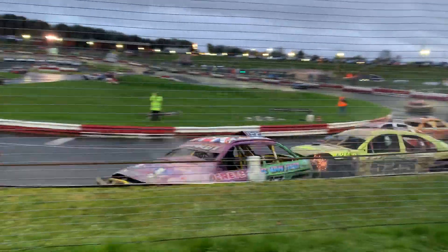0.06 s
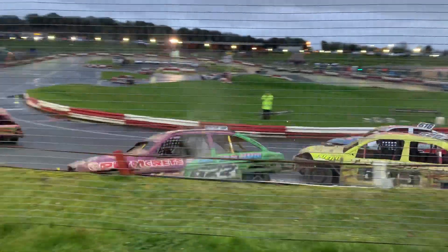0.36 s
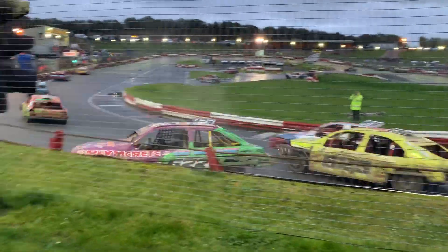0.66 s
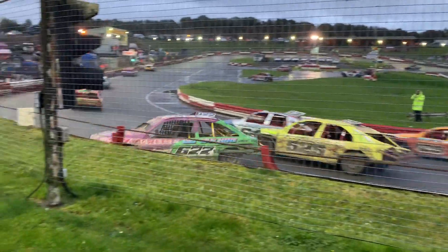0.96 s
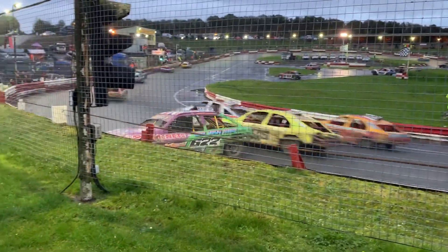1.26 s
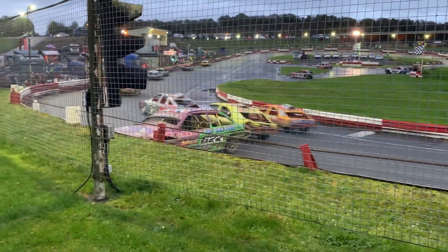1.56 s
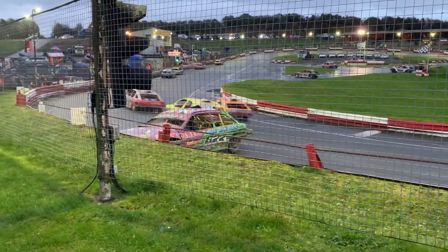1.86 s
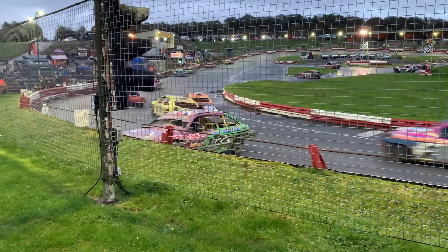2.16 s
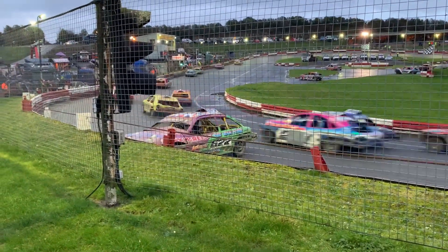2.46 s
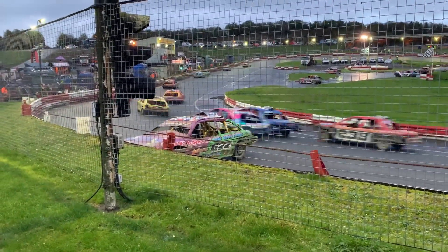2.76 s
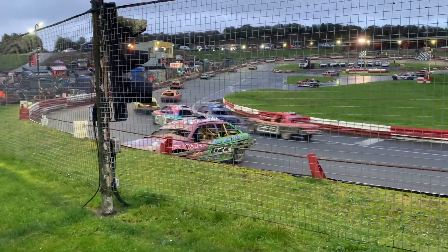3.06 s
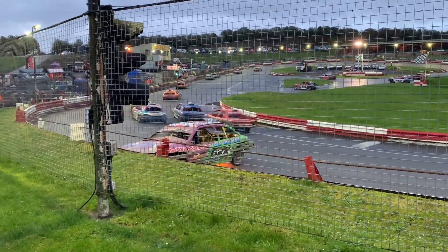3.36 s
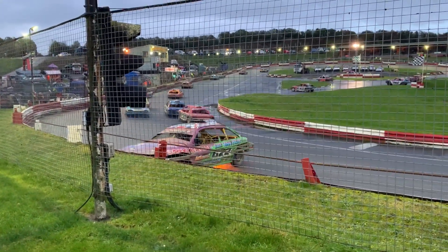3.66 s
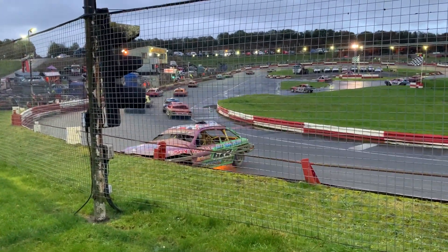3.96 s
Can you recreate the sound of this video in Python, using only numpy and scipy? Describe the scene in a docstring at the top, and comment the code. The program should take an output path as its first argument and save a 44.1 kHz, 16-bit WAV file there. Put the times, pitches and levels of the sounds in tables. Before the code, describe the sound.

Loud stock car engines drone and accelerate after one car crunches and clangs along a barrier.

```python
"""Stock cars accelerate out of a bend on an oval track, heard by a microphone pair at the fence.
In the first second a car crunches along the barrier in three surges: panels boom, steel clangs,
grit sprays and sliding tyres squeal. Then the four-cylinder exhausts, beating against each other,
take over and pop four times around the two-second mark. Near the end tyres squeal again as the
engines climb in pitch. The rest of the field drones behind throughout."""
import sys
import numpy as np
from scipy import signal
from scipy.fft import rfft, irfft, next_fast_len
from scipy.io import wavfile
from scipy.ndimage import uniform_filter1d, minimum_filter1d, map_coordinates

SR = 44100
rng = np.random.default_rng(int(sys.argv[2]) if len(sys.argv) > 2 else 0)


def unload_wav(signal):
    """Save mono or channel-first audio to the path in sys.argv[1] as 16-bit WAV at rate SR, clipped to [-1, 1]."""
    wavfile.write(
        sys.argv[1],
        SR,
        np.round(np.clip(np.atleast_2d(signal).T, -1, 1) * 32767).astype(np.int16),
    )


N = 176400

# Spectrum of the exhaust roar and pops: (frequency [Hz], relative level [dB])
ROAR_SPECTRUM = [(200, -9.5), (330, -11), (480, 0), (620, -3), (760, -15), (920, -8), (1200, -26.5),
                 (2500, -40)]
# Spectrum of grit and cracks: (frequency [Hz], relative level [dB])
GRIT_SPECTRUM = [(1500, -18), (3200, 2), (4300, 4), (5500, -1), (8000, -1), (10500, -5), (13000, -11),
                 (15000, -14), (18000, -20)]
# Modes of struck steel: (frequency [Hz], relative level [dB], 60 dB decay time [s])
STEEL_MODES = [(1040, 1, .11), (1250, -3, .12), (1405, -1, .1), (1513, -2, .1), (1620, -1, .12),
               (1836, 0, .12), (1975, -2, .09), (2085, -3, .09), (2410, -3, .1), (2902, -9, .12),
               (3370, -9, .14), (3736, -13, .14)]
CLANG_RISE_S = 0.00089


def engine(run, trim_db, overtone_db):
    """Harmonic series of four firings a cycle; unequal cylinders add weak orders between the harmonics."""
    # Exhaust pipe overtones: (frequency [Hz], relative level [dB])
    pipe = [(60, -18.5), (180, -8.5), (250, -17), (350, -19.5), (490, -20), (620, -30), (780, -34.5),
            (1000, -35), (1600, -37)]
    # Boom once a crank turn: (crank rate [Hz], level [dB])
    throb_spectrum = [(35, -43.5), (44, -27.5), (51, -30.5), (56, -29.5), (61, -47.5), (90, -42.5)]
    # Swell of that boom: (time [s], gain [dB])
    throb_swell = [(0, -9), (.85, -3.5), (1.05, -0.5), (1.27, -8), (1.45, 3.5), (2.7, 0), (3, -1)]
    uneven_db, drift_db, smear_rad, flutter_db, fade_s = -7.5, 4, 0.9, 1.13, 0.19
    firing_hz, db = curves(run)
    t = clock()
    knots = np.linspace(0, t[-1], 65)
    drift = lambda: np.interp(t, knots, rng.standard_normal(len(knots)))
    fade = np.clip(1 + np.minimum(t - run[0][0], run[-1][0] - t) / fade_s, 0, 1)
    firings = np.cumsum(firing_hz * (1 + 0.004 * wobble(9))) / SR  # the speed wavers
    phase = 2 * np.pi * (firings + 0.006 * wobble(60) + rng.random())  # the timing jitters
    tone = np.sin(phase)
    throb = amp(along(throb_spectrum, firing_hz / 2) + curves(throb_swell)[0]) * np.sin(phase / 2)
    for k in [3, *range(5, 36)]:  # k = 4 is the firing tone itself
        order = k / 4
        level = along(pipe, order * firing_hz) + overtone_db + uneven_db * (k % 4 > 0)
        gain = amp(level + drift_db * drift())
        tone += gain * np.sin(order * phase + smear_rad * drift() + 2 * np.pi * rng.random())
    return np.sqrt(2) * fade * (amp(db + trim_db + flutter_db * wobble(35)) * tone + throb), phase


def near_cars():
    """Beating: five exhausts of differing pitch interfere. Returns their sum and firing phases."""
    # One run per car: (time [s], firing rate [Hz], relative level [dB])
    car_a = [(0, 73, -13), (0.22, 82.3, -33), (0.4, 89.38, -15.5), (0.58, 90.56, -15.5), (0.75, 86.73, -17),
             (0.9, 86, -18.5), (1.08, 88.22, -19.5), (1.27, 88.9, -30.5), (1.43, 96.07, -21.5),
             (1.58, 84.83, -20.5), (1.72, 92.4, -20.5), (1.92, 93.5, -20.5), (2.1, 97.2, -21),
             (2.5, 101.5, -22.5), (2.9, 107.8, -21), (3.22, 111.9, -15), (3.45, 118.5, -18.5),
             (3.65, 125, -18), (4, 132.7, -11.5)]
    car_b = [(0, 152.5, -20.5), (0.2, 150.3, -17.5), (0.42, 146.4, -19), (0.7, 151, -27), (1, 154.7, -27),
             (1.3, 162.5, -19.5), (1.6, 165.3, -21.5), (1.9, 170.8, -21), (2.25, 170.5, -17.5),
             (2.45, 160.4, -23.5), (2.7, 163.2, -18.5), (3.05, 164.2, -23), (3.4, 162.6, -21.5),
             (4, 162, -16.5)]
    car_c = [(0.9, 149.4, -23.5), (1.2, 149.5, -20.5), (1.45, 150, -18), (1.65, 152.2, -20.5),
             (1.85, 157.4, -14.5), (2.1, 160.3, -22), (2.35, 156.2, -21), (2.52, 160, -18),
             (2.7, 166.9, -21.5), (2.95, 170, -19), (3.25, 173, -18.5), (3.5, 179.6, -24),
             (4, 189.7, -19.5)]
    car_d = [(0, 119.5, -25), (0.6, 121, -26), (1.1, 118.5, -26), (1.42, 122.4, -25), (1.57, 126.2, -12),
             (1.76, 126.1, -18.5), (1.95, 122.8, -28.5), (2.4, 121.7, -17.5), (2.8, 123.5, -17),
             (3.15, 124, -19), (3.42, 132.2, -17.5), (3.75, 140.1, -20.5), (4, 142.3, -17.5)]
    car_e = [(0, 129.7, -28.5), (0.3, 131.9, -16.5), (0.6, 136, -18), (1.2, 137.3, -32.5), (1.9, 133, -22),
             (2.05, 137.4, -19), (2.18, 142.8, -28.5), (2.35, 136.9, -13.5), (2.55, 146, -15.5),
             (2.75, 148.1, -26), (3.1, 151.4, -25)]
    sounds, phases = zip(engine(car_a, trim_db=0.49, overtone_db=1),
                         engine(car_b, trim_db=2.5, overtone_db=-1.8),
                         engine(car_c, trim_db=0, overtone_db=-0.44),
                         engine(car_d, trim_db=0, overtone_db=-6.5),
                         engine(car_e, trim_db=-0.82, overtone_db=-4.5))
    return sum(sounds), phases


def exhaust_noise(phases):
    """Amplitude modulation: roar and rasp come in puffs at the firing rates."""
    # Exhaust noise: (time [s], relative roar level [dB], relative rasp level [dB])
    levels = [(1.15, -33.5, -43.5), (1.34, -34, -42.5), (1.42, -32, -41.5), (1.98, -33.5, -44),
              (2.15, -34.5, -44), (2.28, -30.5, -42), (2.55, -35, -43), (2.8, -34.5, -44),
              (3.05, -37, -44.5), (3.3, -36.5, -44.5), (3.78, -34.5, -43), (3.9, -34.5, -44)]
    # Rasp: (frequency [Hz], relative level [dB])
    rasp_spectrum = [(600, -5), (1100, 1), (1650, -1.5), (2200, -9), (2800, -14), (3400, -15.5),
                     (4300, -23), (5500, -30.5), (7500, -38.5)]
    roar_db, rasp_db = curves(levels)
    puffs = unit(amp(0.54 * sum(np.cos(phase) for phase in phases)))
    roar = amp(roar_db + 6.5) * noise(ROAR_SPECTRUM, patchy_db=2)
    rasp = amp(rasp_db + 5.5) * noise(rasp_spectrum, patchy_db=2.5)
    return puffs * (roar + rasp)


def exhaust_pops():
    """Transients: barks with the spectrum of the roar rise sharply and decay exponentially."""
    # Pops: (time [s], level [dB])
    pops = [(1.676, -19.5), (1.742, -23), (1.904, -20.5), (2.341, -23)]
    rise_s, fall_db_per_s = 0.0017, 795.5
    envelope = swells([(s, db, rise_s, 0, fall_db_per_s) for s, db in pops])
    return envelope * noise(ROAR_SPECTRUM, patchy_db=5.5)


def ring(modes, rise_s):
    """Free vibration: one second of damped modes, weighted anew for each blow and wavering in phase."""
    t = clock()[:SR]
    hz, db, t60 = np.transpose(modes)[:, :, None]
    weights = amp(db + 2 * rng.standard_normal(db.shape))
    waver = np.array([np.interp(t, np.arange(110) / 110, rng.standard_normal(110)) for _ in modes])
    phase = 2 * np.pi * (hz * t + rng.random(hz.shape)) + 0.8 * waver
    tones = weights * amp(-60 * t / t60) * np.sin(phase)
    return (1 - np.exp(-t / rise_s)) * tones.sum(axis=0) / np.sqrt(np.sum(weights ** 2) / 2)


def barrier_blows():
    """Impact excitation: each contact cracks, booms a panel and rings the steel around its own pitch."""
    # Contacts: (time [s], boom level [dB], clang level [dB], crack level [dB], clang centre [Hz])
    contacts = [(0.108, -21.5, -21, -37.5, 1664), (0.156, -18, -21.5, -34.5, 2205),
                (0.325, -41.5, -24, -46, 2096), (0.337, -6, -23.5, -43, 1050),
                (0.356, -16.5, -29, -47, 2100), (0.402, -29, -24, -34, 3020), (0.513, -29, -31, -47, 1910),
                (0.739, -37.5, -37.5, -58.5, 1240), (0.821, -18, -33.5, -45, 2400),
                (0.893, -17.5, -31.5, -48.5, 1305)]
    # Body panel: (frequency [Hz], relative level [dB], 60 dB decay time [s])
    panel_modes = [(410, -4, .16), (466, -1.5, 0.17), (540, -9, 0.19), (606.5, -4, 0.12), (720, -6.5, 0.02),
                   (866, -5, 0.081)]
    focus_db_per_octave, crack_rise_s, crack_fall_db_per_s = 16, 0.001, 900
    rings = np.zeros(N + SR)
    for s, boom_db, clang_db, _, centre_hz in contacts:
        struck = [(hz, db - focus_db_per_octave * abs(np.log2(hz / centre_hz)), t60)
                  for hz, db, t60 in STEEL_MODES]
        boom = amp(boom_db) * ring(panel_modes, rise_s=0.00051)
        clang = amp(clang_db) * ring(struck, CLANG_RISE_S)
        rings[round(s * SR):][:SR] += boom + clang
    cracks = swells([(s, db, crack_rise_s, 0, crack_fall_db_per_s) for s, _, _, db, _ in contacts])
    return rings[:N] + cracks * noise(GRIT_SPECTRUM, patchy_db=-4.5)


def bodywork_crunch():
    """Random excitation: crumpling bodywork radiates grainy noise while loose steel rattles."""
    # Scrapes along the barrier: (time [s], level [dB], rise [s], hold [s], fall [dB/s])
    scrapes = [(-.02, -15.5, 0.011, 0.02, 80.5), (0.061, -22, 0.024, 0.038, 90),
               (0.107, -14.5, 0.005, 0.048, 129.5), (0.324, -23, 0.011, 0.029, 139),
               (0.36, -17.5, 0.015, 0.051, 112.5), (0.738, -39.5, 0.0048, .02, 142.5),
               (0.808, -24.5, 0.012, 0.055, 92.5)]
    # Crumpling metal: (frequency [Hz], relative level [dB])
    spectrum = [(150, -11), (300, 5.5), (450, 8), (620, 9), (740, 3), (980, 3), (1200, 3.5), (2000, -4),
                (2450, -6.5), (2700, -11.5), (3400, -14.5), (4600, -20.5), (7000, -33)]
    taps_per_s, scatter_db, rattle_db = 160, 5, -9
    crunch = unit(amp(1.5 * wobble(220)) * noise(spectrum, patchy_db=2.5))
    taps = (rng.random(N) < taps_per_s / SR) * amp(scatter_db * rng.uniform(-1.2, 1, N))
    rattle = unit(signal.fftconvolve(taps, ring(STEEL_MODES, CLANG_RISE_S))[:N])
    return swells(scrapes) * (crunch + amp(rattle_db) * rattle)


def grit():
    """Incoherent summation: grains thrown up by the scrapes merge into bright, flickering noise."""
    # Sprays: (time [s], level [dB], rise [s], hold [s], fall [dB/s])
    sprays = [(-.02, -44, 0.016, 0.13, 58), (.11, -37, 0.01, 0.028, 143), (.345, -38, 0.048, 0.027, 104.5),
              (.815, -46, .015, 0.066, 98.5)]
    return swells(sprays) * unit(amp(0.81 * wobble(600)) * noise(GRIT_SPECTRUM, patchy_db=-2))


def tyre_squeals():
    """Friction-driven oscillation: sliding tyres sing a rough, wavering, gliding note."""
    # Squeals: (time [s], duration [s], start pitch [Hz], end pitch [Hz], level [dB])
    squeals = [(0.553, 0.14, 700, 756, -33), (0.682, .38, 1275, 1251, -39.5), (0.909, .19, 872, 786.4, -28),
               (3.428, 0.12, 492, 455, -21.5), (3.55, 0.23, 612, 546, -27.5), (3.677, .15, 515, 492, -28)]
    fade_s = 0.034
    out = np.zeros(N)
    for s, length, start_hz, end_hz, db in squeals:
        progress = np.clip((clock() - s) / length, 0, 1)
        hz = (start_hz + (end_hz - start_hz) * progress ** 2) * (1 + 0.02 * wobble(160))
        fade = np.minimum(1, np.minimum(progress, 1 - progress) * length / fade_s)
        out += amp(db + 2.5 * wobble(90)) * fade * np.sin(2 * np.pi * np.cumsum(hz) / SR)
    return out


def distant_field():
    """Incoherent summation: the other cars blur into a steady drone over a deep, uneven rumble."""
    # Rumble: (time [s], relative level [dB])
    rumble_levels = [(0.0, -19), (0.72, -28), (0.9, -19.5), (0.93, -24), (1.11, -23.5), (1.27, -43),
                     (1.39, -23), (1.49, -17), (1.59, -58.5), (1.73, -33), (3.39, -27.5), (3.41, -32),
                     (3.9, -32)]
    # Rumble and drone: (frequency [Hz], relative level [dB])
    rumble_spectrum = [(20, -18), (32, -30), (42, -17.5), (62, 1), (95, -2), (130, -6), (300, -74.5)]
    drone_spectrum = [(60, -38.5), (90, -6.5), (125, -5), (170, 11.5), (205, -5), (250, -9.5), (350, -10),
                      (600, -32)]
    rumble = amp(curves(rumble_levels)[0] + 4) * noise(rumble_spectrum, patchy_db=1)
    return rumble + amp(-26) * noise(drone_spectrum, patchy_db=1)


def hiss():
    """Band-limited noise: a faint treble hiss swells and fades."""
    # Swell: (time [s], level [dB])
    levels = [(1, -62.5), (1.3, -63.5), (1.8, -60), (2.1, -65), (2.5, -57), (2.8, -62.5), (3.3, -67.5),
              (3.9, -62.5)]
    # Colour: (frequency [Hz], relative level [dB])
    spectrum = [(2500, -7), (5000, -3.5), (8000, 3), (9500, -4), (11000, 0), (12500, -25)]
    return amp(curves(levels)[0]) * noise(spectrum, patchy_db=1.5)


def noise(spectrum, patchy_db):
    """Partial coherence: mid and side noise, with patches of random gain, form a stereo pair of rms 1."""
    # Likeness of left and right: (frequency [Hz], correlation [1])
    coherence = [(50, 0.94), (170, 0.74), (280, 0.82), (450, 0.89), (600, 0.92), (780, 0.72), (1500, 0.21),
                 (2000, 0.86), (3000, 0.31), (4400, 1), (6600, 0.96), (8000, 0.86), (10000, 0.1),
                 (12000, 0.98)]
    def response(hz):
        angle = np.arccos(np.clip(along(coherence, hz), -1, 1)) / 2
        gain = amp(along(spectrum, hz)) / (1 + (hz / spectrum[-1][0]) ** 10)
        return gain * [np.cos(angle), np.sin(angle)]
    cells = signal.stft(rng.standard_normal((2, N)), nperseg=2048)[2]
    patches = uniform_filter1d(rng.standard_normal(cells.shape[1:]), size=3, axis=0)
    patches = uniform_filter1d(patches, size=7, axis=1)
    pair = signal.istft(cells * amp(patchy_db * unit(patches)), nperseg=2048)[1][:, :N]
    mid, side = filtered(pair, response)
    return unit(np.array([mid + side, mid - side]))


def swells(events):
    """Power addition: the joint envelope of events that rise, hold and decay."""
    t = clock()
    power = 0
    for s, db, rise, hold, fall in events:
        attack = np.clip((t - s) / rise, 0, 1)
        power += (attack * amp(db - fall * np.maximum(t - s - rise - hold, 0))) ** 2
    return np.sqrt(power)


def amp(db):
    """Decibels to amplitude ratio."""
    return 10 ** (np.asarray(db) / 20)


def unit(x):
    """Normalisation to rms 1."""
    return x / np.sqrt(np.mean(x ** 2) + 1e-20)


def clock():
    """Time of every sample."""
    return np.arange(N) / SR


def along(points, hz):
    """Interpolation on a logarithmic frequency axis."""
    f, values = np.transpose(points)
    return np.interp(np.log(hz + 1), np.log(f + 1), values)


def curves(rows):
    """Interpolation in time: one curve for each column after the first."""
    s, *columns = np.transpose(rows)
    return [np.interp(clock(), s, column) for column in columns]


def wobble(rate):
    """Random modulation: a smooth curve with rate knots a second."""
    return map_coordinates(rng.standard_normal(4096), [clock() * rate], mode="wrap")


def filtered(x, response):
    """Linear filtering: the spectrum of x times a complex frequency response."""
    size = next_fast_len(N + SR // 2)
    return irfft(rfft(x, size) * response(np.fft.rfftfreq(size, 1 / SR)), size)[..., :N]


def limiter(x, ceiling=0.95, window_s=0.014):
    """Peak limiting: the gain ducks smoothly under peaks that would pass the ceiling."""
    size = int(window_s * SR)
    needed = np.minimum(1, ceiling / (np.abs(x).max(axis=0) + 1e-9))
    held = minimum_filter1d(needed, size=2 * size)
    return x * uniform_filter1d(uniform_filter1d(held, size=size), size=size)


def scene():
    """Superposition of race, crash and tyres; the engine tones and the field dip briefly four times."""
    # Dips in level: (time [s], half width [s], depth [dB])
    dips = [(1.23, 0.019, 2), (2.624, 0.012, 14), (2.84, 0.014, 4.5), (3.921, 0.024, 5)]
    dip_db = sum(depth * np.exp(-((clock() - s) / width) ** 2) for s, width, depth in dips)
    cars, phases = near_cars()
    race = amp(-dip_db) * (cars + distant_field()) + exhaust_noise(phases) + hiss() + exhaust_pops()
    crash = bodywork_crunch() + grit() + barrier_blows()
    return race + crash + tyre_squeals()


def record(dry):
    """Frequency response: the microphones differ in phase and treble peak; limiter and low-pass follow."""
    # Microphone pair: (frequency [Hz], phase lead of the left [rad])
    phase_lead = [(60, 0), (130, .2), (215, .9), (260, 1.8), (345, 3.1), (600, 5), (870, 7.2), (980, 9.4),
                  (1150, 10.2), (1260, 12.8), (1550, 13.6), (1750, 11.9), (2600, 11.9), (3100, 15),
                  (3400, 14.8), (3700, 18.7), (4750, 18.9), (5200, 21.9), (5850, 22.1), (6300, 25),
                  (7050, 25.2), (7800, 28), (8200, 28.4), (9300, 32), (11000, 28.4), (12400, 28.2),
                  (13000, 25.1)]
    peak_hz, width_hz, left_db, right_db, cutoff_hz = 8000, 1390, 3.5, 17, 15400
    def microphones(hz):
        peak = (hz > peak_hz) * np.exp(-((hz - peak_hz) / width_hz) ** 2)
        shift = np.exp(0.5j * along(phase_lead, hz))
        return np.array([amp(left_db * peak) * shift, amp(right_db * peak) / shift])
    return filtered(limiter(filtered(dry, microphones)), lambda hz: hz < cutoff_hz)


dry = scene()
out = record(dry)
unload_wav(out)
```